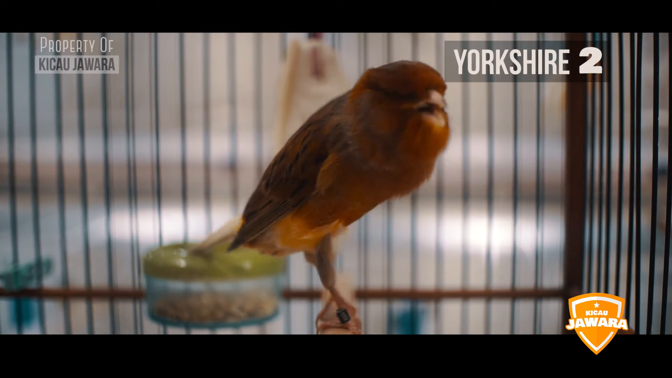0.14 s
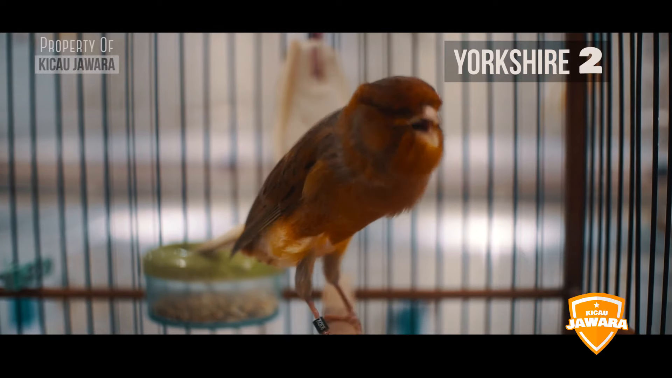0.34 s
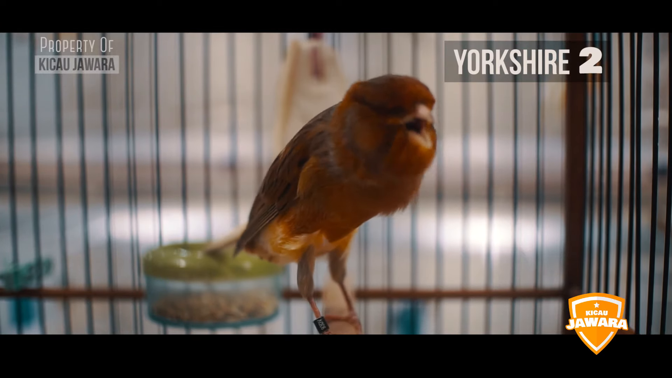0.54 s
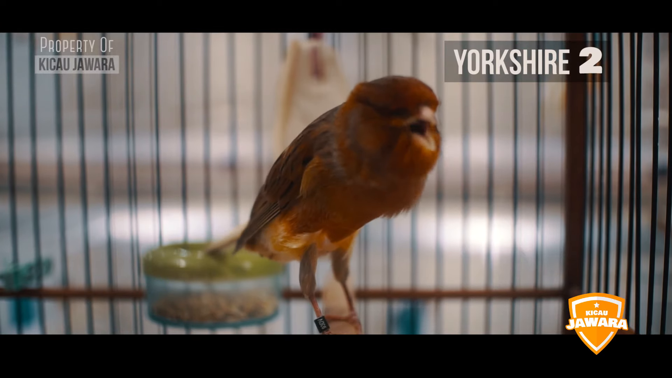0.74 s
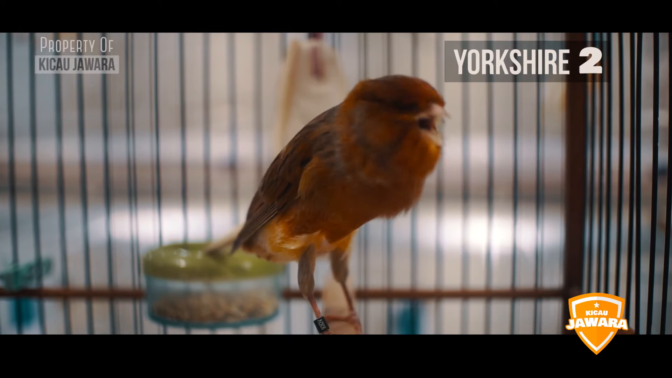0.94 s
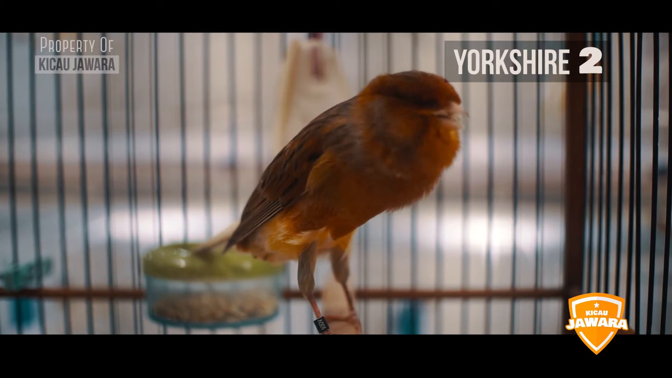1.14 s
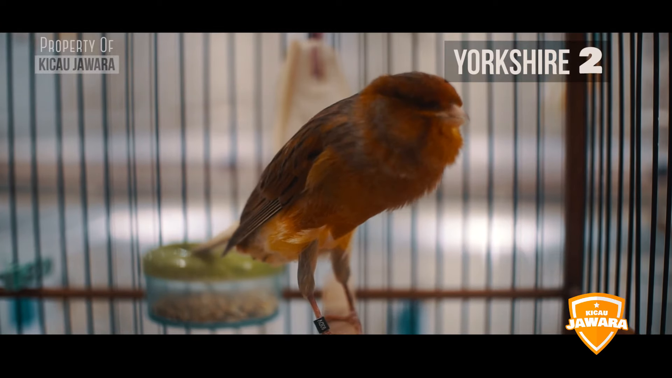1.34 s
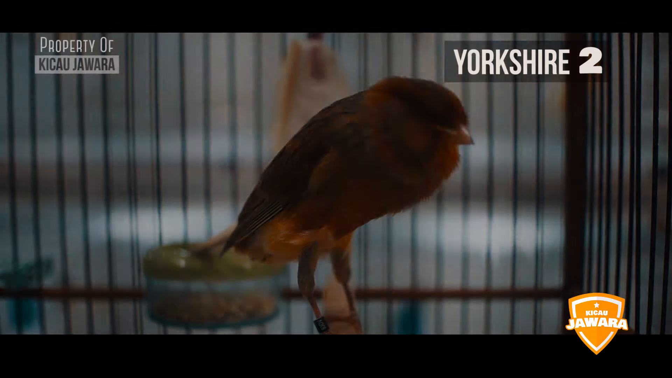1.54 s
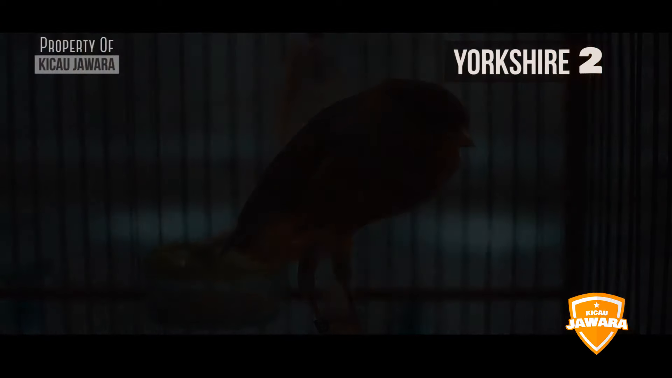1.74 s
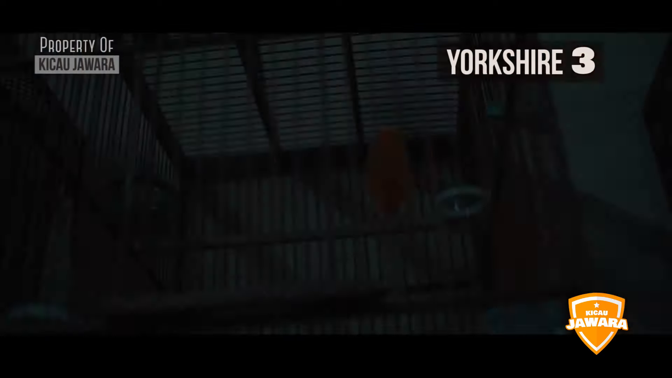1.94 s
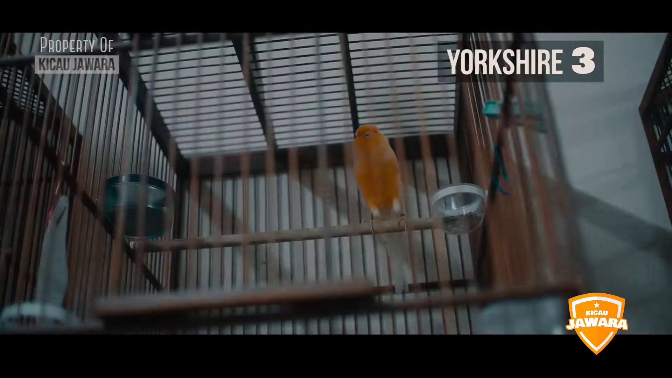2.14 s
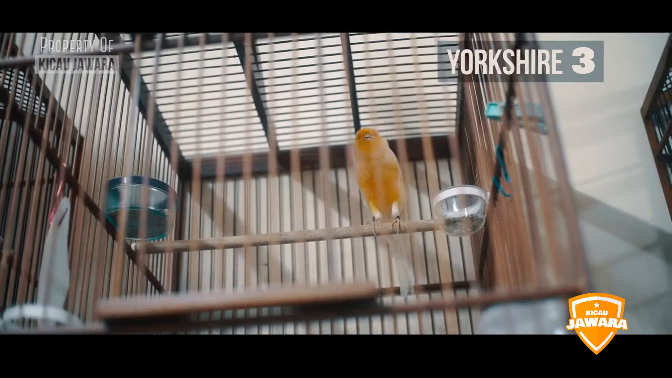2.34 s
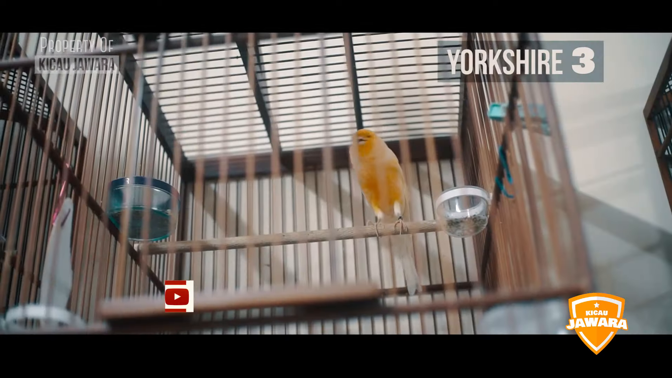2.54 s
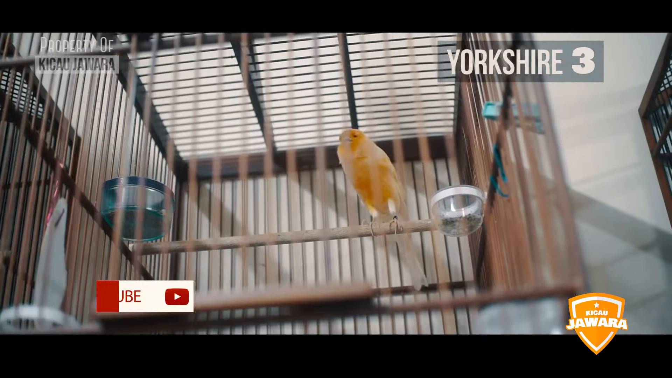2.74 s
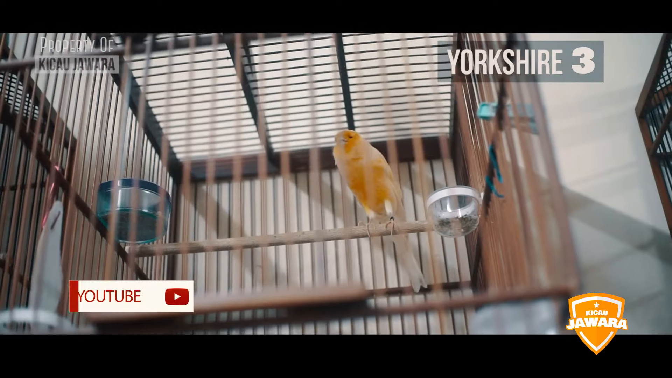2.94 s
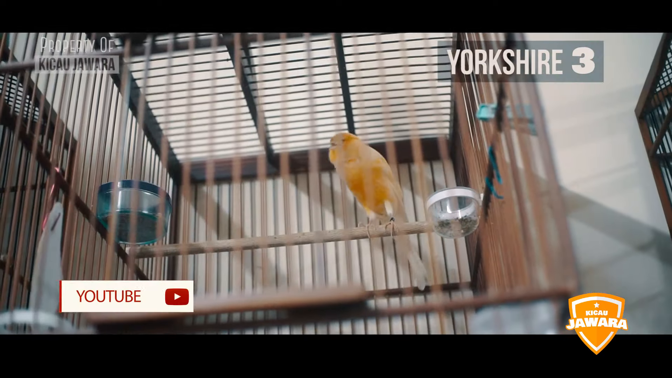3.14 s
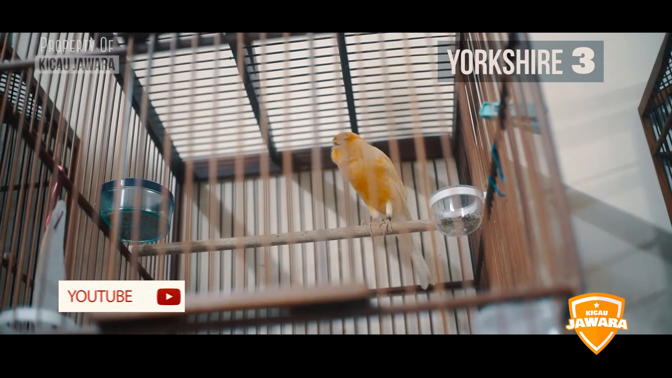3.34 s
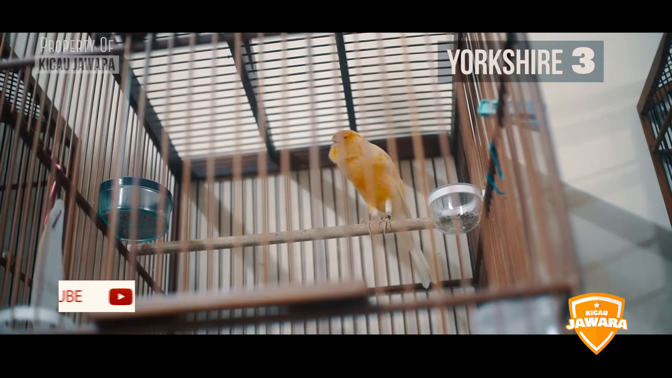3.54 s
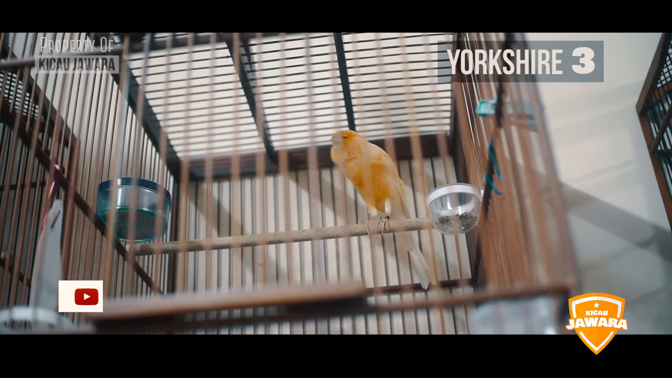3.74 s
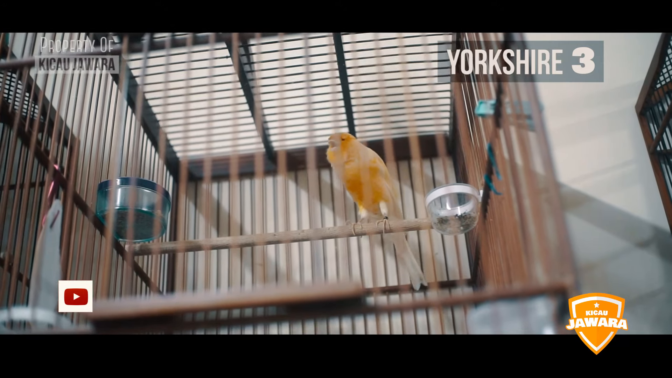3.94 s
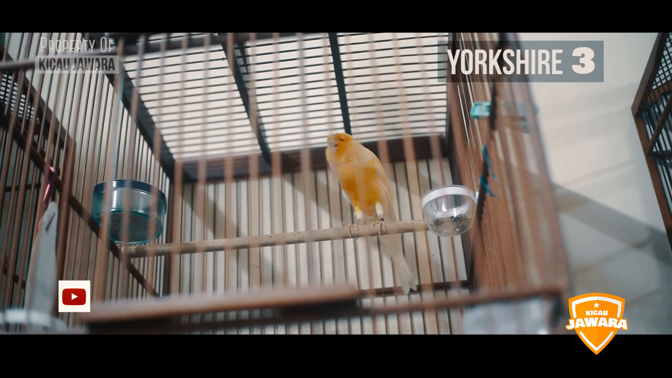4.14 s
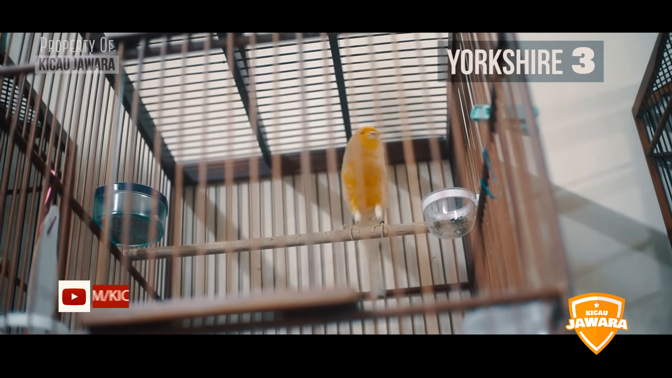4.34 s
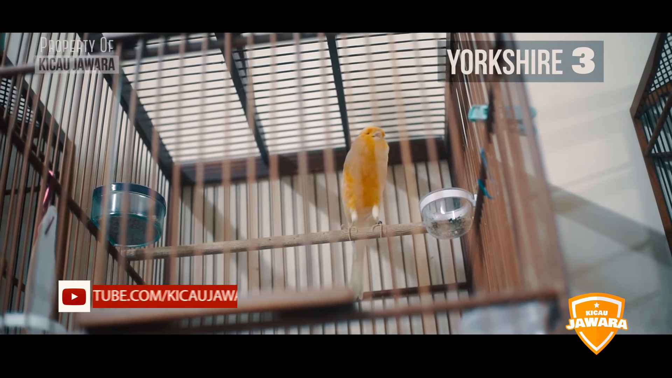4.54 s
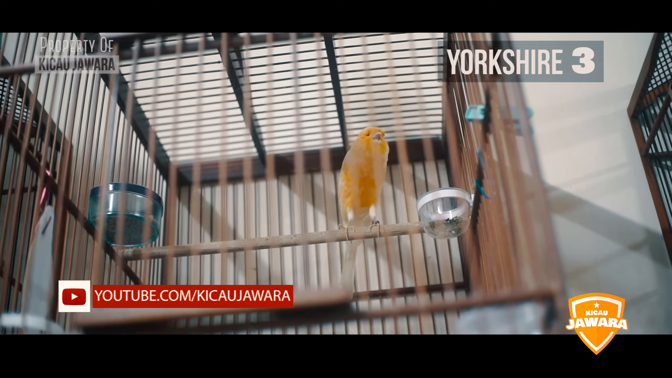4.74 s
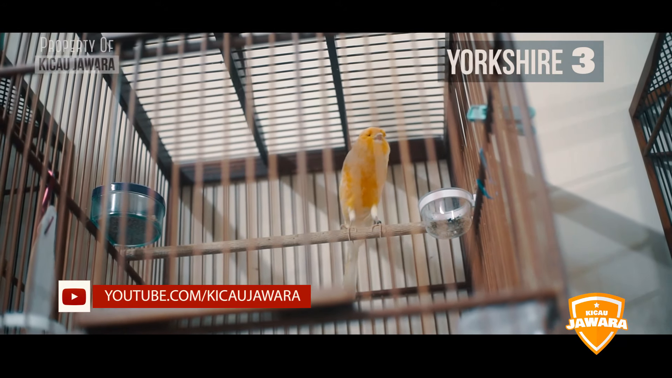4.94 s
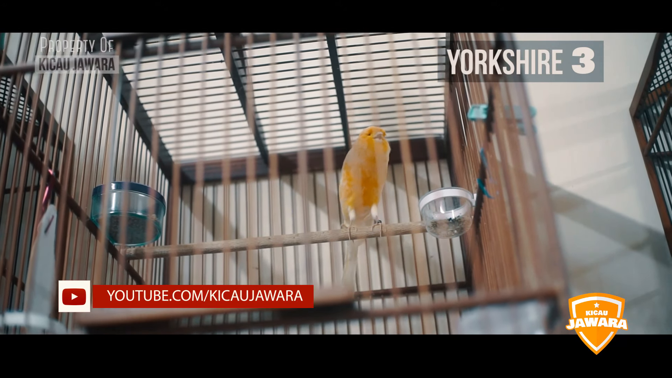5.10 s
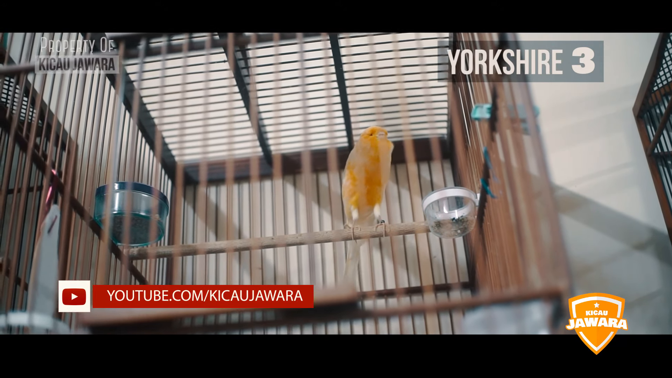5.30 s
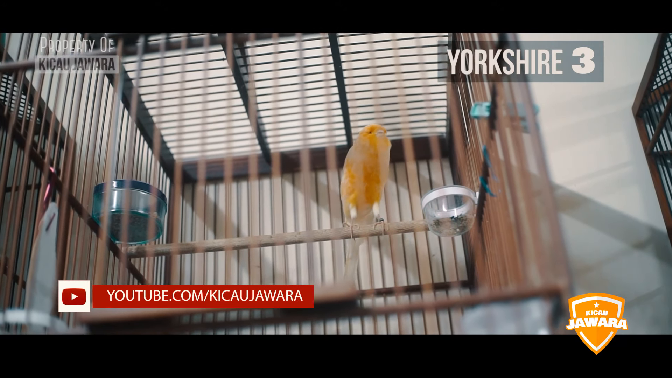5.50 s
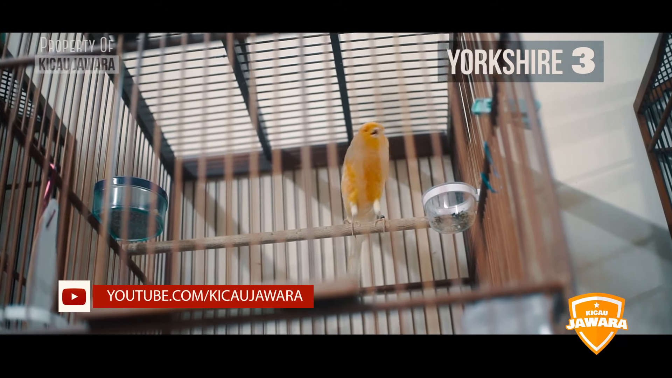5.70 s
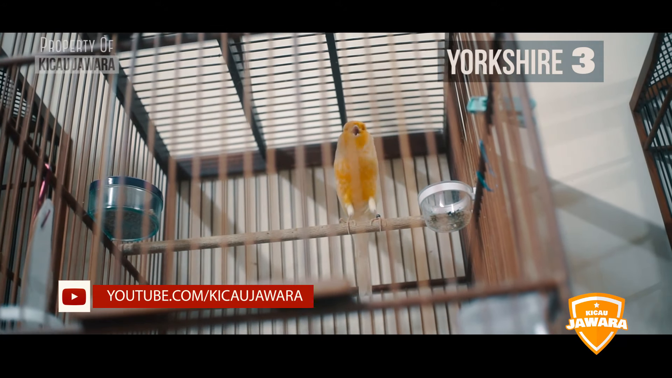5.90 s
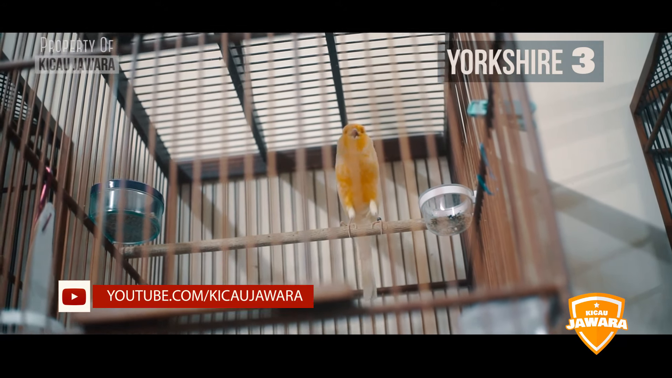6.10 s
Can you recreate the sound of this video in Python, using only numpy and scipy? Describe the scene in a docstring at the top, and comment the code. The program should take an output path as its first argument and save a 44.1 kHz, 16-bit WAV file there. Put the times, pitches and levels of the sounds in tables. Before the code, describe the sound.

A canary trills loudly, then a second answers with a faster trill and slower downward whistles, above a low room rumble.

```python
"""Indoors by two bird cages: one canary trills in a fairly dry room, then another sings in a livelier one.
Each syllable is a near-pure whistle from the syrinx, sliding down in pitch.
Other birds call farther off, and a lamp whines on every mains cycle near the first cage.
Underneath lies a bed of low rumble, hum and room air, with a short rustle in the cage."""
import sys
import numpy as np
from scipy import signal
from scipy.fft import rfft, irfft
from scipy.io import wavfile
from scipy.ndimage import uniform_filter1d, minimum_filter1d, map_coordinates

SR = 44100
rng = np.random.default_rng(int(sys.argv[2]) if len(sys.argv) > 2 else 0)


def unload_wav(signal):
    """Save mono or channel-first audio to the path in sys.argv[1] as 16-bit WAV at rate SR, clipped to [-1, 1]."""
    wavfile.write(
        sys.argv[1],
        SR,
        np.round(np.clip(np.atleast_2d(signal).T, -1, 1) * 32767).astype(np.int16),
    )


N = 271656
PREROLL = SR // 2   # samples of song before time zero, whose echoes still ring

# fader rides for the bed: t/s, rumble level/dB, room air level/dB
BED_RIDE = [(0, -54, -51), (.86, -54, -53.5), (1.44, -48.5, -49.5), (2.02, -38.5, -45), (2.33, -38, -45),
            (2.65, -40, -42.5), (2.88, -43.5, -51), (3.9, -43.5, -49.5), (4.5, -48, -51.5),
            (5.05, -47, -53), (5.4, -44, -49.5), (6.16, -43, -47)]
# fader rides for the hum, a low murmur of air and the lamp: t/s, level/dB
HUM_RIDE = [(0, -12), (1, -4), (2, -1), (3.6, -6), (4.8, -4), (5.3, 5), (6.16, 2)]
MURMUR_RIDE = [(0, -68), (.8, -60), (1.2, -53), (2.2, -53), (2.8, -59), (3.4, -68), (6.16, -64)]
LAMP_RIDE = [(0, -7), (1.1, -3), (1.4, -1), (1.9, -2), (2.3, -3), (2.6, -30)]
# noise colours: f/Hz, level/dB
RUMBLE_EQ = [(8.8, -32), (15, 1), (32, -0.5), (59, 2), (69, -1.5), (86, -11.5), (123, -7), (200, -19),
             (260, -46.5), (440, -120)]
AIR_EQ = [(120, -0.5), (300, -5), (700, -10.5), (1300, -11.5), (2000, -17), (7000, -21), (10000, -21),
          (16000, -25)]
# tones of the hum and the lamp, ahead of their faders: f/Hz, level/dB
HUM_TONES = [(59.2, -51), (118.4, -56.5)]
LAMP_TONES = [(9700, -50.5), (12930, -49)]
# soft knocks in the cage: t/s, level/dB
KNOCKS = [(2.342, -35.5), (2.496, -32.5), (2.538, -31.5), (2.599, -38), (2.649, -38.5)]

# reverbs: direct/dB, tail/dB, mid t60/s, treble t60/s, early echoes/dB, early t60/s, width/dB
DRY_REVERB = 0, -16, 1.0, .6, -19, 0.13, -6
LIVE_REVERB = 0, -7.5, .75, .5, -11, .05, -6
FAR_REVERB = -7, -3, .55, 0.35, -7, 0.15, -6
NEIGHBOUR_REVERB = -1.5, -8, .6, .5, -8, .10, -6
# single reflections close to the second cage: delay/s, gain
CAGE_TAPS = [(.00322, .2), (.00385, -.35), (.00594, .2), (.0100, .15)]

# a neighbouring bird's whistles: t/s, length/s, level/dB
NEIGHBOUR_CUES = [(1.532, .10, -34), (1.714, .116, -30), (1.93, .13, -24.5), (2.145, .145, -26)]
# far calls, and pips by the second cage: t/s, length/s, first f/Hz, last f/Hz, level/dB, change/dB
FAR_CUES = [(1.33, .17, 5900, 5800, -49, -4), (1.41, .07, 3250, 3280, -56, 5),
            (1.447, .075, 3700, 4750, -34, -7), (1.49, .09, 5200, 6150, -48, -4),
            (1.515, .015, 2000, 2000, -53, 1), (1.525, .03, 2700, 2500, -42, -3),
            (1.575, .03, 2650, 2600, -46, -1), (1.62, .02, 2000, 2000, -54, -1),
            (1.635, .03, 2650, 2550, -46, -1), (1.69, .04, 2550, 2500, -50, -1),
            (1.665, .15, 4300, 6050, -45, -2), (1.865, .03, 3500, 4100, -44, -2),
            (1.90, .03, 3300, 3800, -40, -2), (1.93, .10, 4250, 4330, -43, -1),
            (1.91, .06, 6450, 6000, -45, -2), (1.97, .07, 5400, 6500, -49, -2),
            (1.93, .19, 2800, 2800, -46, -6), (1.93, .18, 2200, 2150, -57, -6),
            (2.83, .04, 2000, 1900, -55, -1), (3.17, .03, 2400, 2300, -55, -1),
            (3.22, .03, 1950, 1900, -55, -1), (3.42, .03, 2250, 2200, -51, -1)]
PIP_CUES = [(4.145, .035, 3750, 4050, -19, 3), (4.235, .023, 3680, 3700, -15, -.3),
            (4.30, .03, 3630, 3610, -22, 4), (4.385, .03, 3640, 3600, -17, -4),
            (4.455, .025, 3620, 3630, -18, -.3), (4.495, .025, 3610, 3610, -22, -.3),
            (4.55, .04, 3620, 3620, -27, -.3)]

# canary slides: t/s, slide length/s, top f/Hz, bottom f/Hz, haste (over 1 falls early), level/dB
TRILL_CUES = [(0.115, .063, 6920, 3850, .7, -8), (0.233, .059, 6920, 3000, .75, -8),
              (0.331, .052, 6830, 3000, 1.01, -8.5), (0.422, .053, 6790, 3000, .95, -8.5),
              (0.517, .050, 6830, 3000, 1.05, -9), (0.611, .051, 6850, 3000, .92, -8.5),
              (0.704, .052, 6770, 3000, .98, -8.5), (0.799, .053, 6790, 3000, 1.05, -10),
              (0.893, .051, 6750, 3000, 1.02, -9), (0.989, .055, 6620, 3000, 1.14, -8.5),
              (1.094, .050, 6750, 3800, 1.22, -10.5)]
LONG_CUES = [(3.718, .167, 6650, 1300, .99, -8.5), (3.954, .163, 6650, 1400, .95, -7),
             (4.189, .182, 6650, 1700, 1.07, -9), (4.446, .185, 6590, 1900, 1.15, -9),
             (4.708, .139, 6510, 2000, .9, -10.5), (4.919, .126, 6490, 2250, .87, -11)]
# the second bird's fast trill: t/s, level/dB
FAST_CUES = [(2.186, -13), (2.273, -12.5), (2.355, -11.5), (2.437, -11), (2.521, -10), (2.606, -10.2),
             (2.691, -10.5), (2.778, -10), (2.864, -10), (2.951, -11), (3.038, -10.5), (3.128, -11.5),
             (3.218, -11.5), (3.308, -10.5), (3.401, -11.5)]
# its closing bent slides: t/s, slide length/s, top f/Hz, level/dB
BENT_CUES = [(5.116, .091, 6240, -9.5), (5.277, .093, 6360, -9), (5.447, .093, 6260, -9),
             (5.619, .088, 6300, -9), (5.782, .094, 6350, -8), (5.954, .094, 6380, -7.5),
             (6.126, .093, 6340, -7.5)]
# notes drawn point by point: t/s, f/Hz, level/dB
FRAMING_NOTES = [
    [(-.11, 6900, -16), (-.02, 4900, -14), (0, 4450, 0), (.02, 4000, -11.5), (.036, 3550, -2.5),
     (.055, 2750, -1), (.062, 1200, -20.5)],
    [(1.163, 3300, 1), (1.172, 2900, 0.5), (1.180, 2400, -6), (1.188, 1300, -10.5)],
]   # deep notes either side of the first bird's trill
OPENING_NOTES = [
    [(2.044, 4750, -20), (2.049, 4500, -16), (2.054, 3800, -16.5)],
    [(2.098, 6050, -30), (2.110, 5850, -17), (2.128, 5000, -14), (2.136, 4400, -12), (2.142, 3600, -18)],
]   # the second bird's two pickups
SHELF_NOTE = [(3.499, 6400, -12), (3.514, 5950, -11), (3.540, 5800, -10), (3.567, 5300, -9),
              (3.614, 4000, -9), (3.635, 3500, -9), (3.646, 3100, -9), (3.648, 1900, -9), (3.653, 1250, -9)]   # lingers, then falls, to open the long slides
# pitch envelopes: ladder [share of length, f/Hz], top hold/s, plunge [t/s after ladder, share of drop]
TRILL_BEND = [(.44, 6000), (.73, 5000), (1, 4000)], .007, [(.006, .45), (.010, 1)]
FAST_BEND = [(.40, 5500), (.70, 4800), (1, 4300)], .004, [(.007, .40), (.011, 1)]
LONG_BEND = ([(.26, 6000), (.49, 5300), (.68, 4600), (.83, 4000), (.94, 3500), (1, 3100)],
             .012, [(.002, .67), (.007, 1)])
BENT_BEND = ([(.20, 6000), (.435, 5000), (.61, 4000), (.84, 3500), (1, 3000)],
             .006, [(.009, .22), (.017, 1)])
# how loud each pitch sounds, coloured by the bird and nearby reflections: f/Hz, added level/dB
TRILL_EQ = [(1200, -26), (2000, -21), (2600, -13), (3300, -13), (3900, 2.5), (4500, 6), (5200, 1.5),
            (5650, -8), (5950, -17), (6350, -4), (6900, -2.5)]
FAST_EQ = [(3100, -12), (3650, -4), (4000, 3), (4200, 7), (4600, -1), (5200, -6), (5700, -6), (6050, -3)]
LONG_EQ = [(1300, -16), (1900, -21), (2500, -8.5), (3000, -3), (3500, -2), (4200, 1), (4800, -2),
           (5400, -5), (5850, -1.5), (6200, -5), (6650, -3.5)]
BENT_EQ = [(900, -23), (1500, -16), (2100, -13), (2700, -3), (3200, -2), (3800, 2), (4300, -1), (5000, -6),
           (5700, -8), (6350, -2)]
FLAT_EQ = [(1000, 0), (8000, 0)]
# harmonics 2, 3 and 4 against a fundamental at 5 kHz: level/dB
TRILL_HARMONICS = (-24.5, -27, -46)
FAST_HARMONICS = (-27, -29, -42)
SLIDE_HARMONICS = (-28, -30, -39)


def amp(db):
    """Decibels to gain."""
    return 10 ** (np.asarray(db) / 20)


def eq_db(curve, hz):
    """Read an EQ curve on a log frequency axis."""
    curve_hz, db = np.transpose(curve)
    return np.interp(np.log(np.maximum(hz, 1)), np.log(curve_hz), db)


def ride(rows):
    """Each fader's position at every sample."""
    times, *faders = np.transpose(rows)
    return [np.interp(np.arange(N) / SR, times, fader) for fader in faders]


def drift(rate_hz, count):
    """A smooth random wobble with a spread of about 1."""
    knots = rng.standard_normal(int(count / SR * rate_hz) + 3)
    return map_coordinates(knots, [np.arange(count) / SR * rate_hz], order=3)


def pass_filter(x, kind, hz, order):
    """Butterworth low-pass or high-pass."""
    return signal.sosfilt(signal.butter(order, hz, kind, fs=SR, output="sos"), x)


def widen(mid, side, side_db):
    """Mid and side to left and right."""
    return mid + amp(side_db) * side * np.array([[1], [-1]])


def noise(eq, side_db):
    """Stereo noise coloured by an EQ curve, at rms 1."""
    gain = amp(eq_db(eq, np.arange(N // 2 + 1) * SR / N))
    mid, side = irfft(rfft(rng.standard_normal((2, N))) * gain, N)
    stereo = widen(mid, side, side_db)
    return stereo / np.sqrt(np.mean(stereo ** 2) + 1e-20)


def room(x, reverb):
    """Direct sound, dense early echoes and a tail that dies sooner in the treble; trims the preroll."""
    direct_db, tail_db, mid_t60, treble_t60, early_db, early_t60, side_db = reverb
    t = np.arange(SR) / SR

    def decay(t60):
        return rng.standard_normal((2, SR)) * amp(-60 * t / t60) * np.sqrt(2 * np.log(1000) / (t60 * SR))

    tail = pass_filter(decay(mid_t60), "low", 4000, 2) + pass_filter(decay(treble_t60), "high", 4000, 2)
    echoes = (amp(tail_db) * tail + amp(early_db) * decay(early_t60)) * np.clip(t / .003, 0, 1)
    echoes = pass_filter(echoes, "low", 15000, 1)   # air and curtains dull the echoes
    mid, side = signal.fftconvolve(x[None], echoes, axes=1)[:, PREROLL:PREROLL + N]
    side = side + 1.5 * pass_filter(side, "high", 7000, 2)   # short waves differ more from left to right
    return amp(direct_db) * x[PREROLL:] + widen(mid, side, side_db)


def room_tone():
    """The bed: wavering hum, lumpy rumble, mic hiss, room air and a murmur swelling between the songs."""
    t = np.arange(N) / SR
    rumble_db, air_db = ride(BED_RIDE)
    hum = sum(amp(db + 3 * drift(9, N)) * np.sin(2 * np.pi * hz * t) for hz, db in HUM_TONES)
    hum *= amp(ride(HUM_RIDE)[0])
    rumble = amp(rumble_db + 1.5 * drift(6, N)) * noise(RUMBLE_EQ, side_db=-11)
    rumble *= amp([[1.5], [-1.5]])   # leans left
    hiss = amp(-64) * noise([(3000, -30), (6000, 0), (16000, -4)], side_db=-4)
    murmur_gain = amp(ride(MURMUR_RIDE)[0] + 2.5 * drift(8, N))
    murmur = murmur_gain * noise([(60, -30), (100, 0), (300, -4), (500, -25)], side_db=-17)
    air = amp(air_db) * noise(AIR_EQ, side_db=-18)
    return hum + rumble + murmur + hiss + air


def lamp_whine(mains_hz=50, offset_s=.008):
    """Two thin tones that retrigger and sound for half of each mains cycle."""
    cycle_s = (np.arange(N) / SR - offset_s) % (1 / mains_hz)
    tones = sum(amp(db) * np.sin(2 * np.pi * hz * cycle_s) for hz, db in LAMP_TONES)
    gate = cycle_s < .5 / mains_hz
    return tones * gate * amp(ride(LAMP_RIDE)[0])


def cage_rustle(t60=.08):
    """Soft knocks in the cage: short, dull puffs of noise."""
    hits = np.zeros(N)
    for start, db in KNOCKS:
        hits[round(start * SR)] = amp(db)
    envelope = signal.lfilter([1], [1, -amp(-60 / (t60 * SR))], hits + 1e-18)
    return envelope * noise([(150, -3), (320, 4), (1000, 1.5), (2000, -8.5), (5000, -20)], side_db=-24.5)


def whistle(notes, pitch_colour, harmonics_db, attack_s, waver_db, release_s=.003, haze_db=-33):
    """The syrinx sings a slightly unsteady sine with weak harmonics; an EQ curve sets level by pitch."""
    track = np.zeros(PREROLL + N + SR)
    for note in notes:
        times, hz, db = np.transpose(note)
        span = np.arange(round(times[0] * SR), round(times[-1] * SR))
        t, count = span / SR, len(span)
        pitch = uniform_filter1d(np.interp(t, times, hz), 151, mode="nearest")   # muscles round corners
        pitch *= 1 + .004 * drift(250, count)
        phase = 2 * np.pi * (np.cumsum(pitch) / SR + rng.random())
        fades = np.clip((t - times[0]) / attack_s, 0, 1) * np.clip((times[-1] - t) / release_s, 0, 1)
        level_db = np.interp(t, times, db) + eq_db(pitch_colour, pitch) + waver_db * drift(120, count)
        level = fades * amp(level_db)
        # a faint high hiss that swells with the loudest notes
        haze = amp(haze_db) * level * pass_filter(rng.standard_normal(count), "high", 7500, 4)
        voice = np.sin(phase) + haze
        beak_lift = (pitch / 5000) ** 1.2   # an open beak favours the harmonics of high notes
        for k, harmonic_db in enumerate(harmonics_db, start=2):
            gain = amp(harmonic_db + 3 * drift(200, count)) * beak_lift
            voice += gain * np.sin(k * phase) * (k * pitch < .45 * SR)
        track[span + PREROLL] += level * voice
    return track[:PREROLL + N]


def glide(start, length, first_hz, last_hz, db, change_db):
    """A call that covers most of its glide early, then settles."""
    knee = (start + .3 * length, first_hz + .8 * (last_hz - first_hz), db + .3 * change_db)
    return [(start, first_hz, db), knee, (start + length, last_hz, db + change_db)]


def arch(start, length, db, base_hz=3200, rise_hz=120):
    """A nearly flat note that lifts a little and falls back."""
    crest = (start + .55 * length, base_hz + rise_hz, db)
    return [(start, base_hz, db - .5), crest, (start + length, base_hz, db - .5)]


def twitter(count=140, from_s=1.5, to_s=2.4, low_hz=2400, high_hz=6500, note_s=.015):
    """A blur of far birds: tiny notes at random times and pitches, each gliding up or down."""
    notes = []
    for when, height, bend, strength in rng.random((count, 4)):
        start = from_s + (to_s - from_s) * when
        first_hz = low_hz * (high_hz / low_hz) ** height
        last_hz = first_hz * (1 + .6 * (bend - .5))
        notes.append(glide(start, note_s, first_hz, last_hz, db=-48 + 4 * (strength - .5), change_db=-2))
    return notes


def other_birds():
    """The supporting voices: a neighbour's whistles, fluttering far calls and soft close pips."""
    neighbour = whistle([arch(*cue) for cue in NEIGHBOUR_CUES], FLAT_EQ, (), attack_s=.008, waver_db=2.5)
    far_notes = [glide(*cue) for cue in FAR_CUES] + twitter()
    far = whistle(far_notes, FLAT_EQ, (), attack_s=.008, waver_db=3)
    pips = whistle([glide(*cue) for cue in PIP_CUES], FLAT_EQ, (), attack_s=.006, waver_db=1.5)
    return room(neighbour, NEIGHBOUR_REVERB) + room(pips, LIVE_REVERB) + room(far, FAR_REVERB)


def slide(bend, start, length, top_hz, bottom_hz, haste, db):
    """A canary syllable holds its top note, slides down a ladder of pitches and ends in a plunge."""
    ladder, hold_s, plunge = bend
    last_hz = ladder[-1][1]
    points = [(0, top_hz), (hold_s, top_hz)]
    points += [(length * share ** haste, hz) for share, hz in ladder]
    points += [(length + s, last_hz + share * (bottom_hz - last_hz)) for s, share in plunge]
    return [(start + s, hz, db) for s, hz in points]


def first_canary():
    """A trill of falling whistles between two deep notes, in the drier room."""
    notes = FRAMING_NOTES + [slide(TRILL_BEND, *cue) for cue in TRILL_CUES]
    return room(whistle(notes, TRILL_EQ, TRILL_HARMONICS, attack_s=.009, waver_db=1.3), DRY_REVERB)


def second_canary():
    """Fast trill, long slides and bent slides in the livelier room; close reflections make them beat."""
    fast = []
    for start, db in FAST_CUES:
        length = .0305 + .003 * (start - FAST_CUES[0][0])   # syllables stretch as the trill goes on
        fast.append(slide(FAST_BEND, start, length, top_hz=6070, bottom_hz=3100, haste=1, db=db))
    long = [slide(LONG_BEND, *cue) for cue in LONG_CUES]
    bent = [slide(BENT_BEND, start, length, top_hz, bottom_hz=950, haste=1, db=db)
            for start, length, top_hz, db in BENT_CUES]
    phrases = [(OPENING_NOTES + fast, FAST_EQ, FAST_HARMONICS),
               ([SHELF_NOTE] + long, LONG_EQ, SLIDE_HARMONICS),
               (bent, BENT_EQ, SLIDE_HARMONICS)]
    song = sum(whistle(*phrase, attack_s=.004, waver_db=2.5) for phrase in phrases)
    reflections = sum(gain * np.roll(song, round(delay * SR)) for delay, gain in CAGE_TAPS)
    return room(song, LIVE_REVERB) + reflections[PREROLL:]


def scene():
    """The mix: birds panned a little right, over lamp, room tone and rustle."""
    birds = first_canary() + second_canary() + other_birds()
    return birds * amp([[-.76], [.76]]) + lamp_whine() + room_tone() + cage_rustle()


def record(dry):
    """The master: a quick limiter holds the peaks, then a steep low-pass cuts the top."""
    ceiling, cutoff_hz = .86, 15900
    allowed = np.minimum(1, ceiling / (np.abs(dry).max(0) + 1e-9))
    gain = uniform_filter1d(minimum_filter1d(allowed, size=181), size=91)
    return signal.sosfilt(signal.ellip(12, .5, 80, cutoff_hz, fs=SR, output="sos"), dry * gain)


dry = scene()
out = record(dry)
unload_wav(out)
```